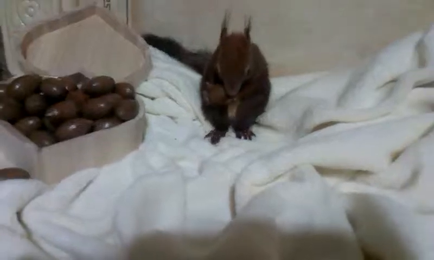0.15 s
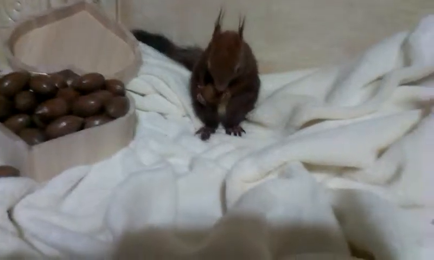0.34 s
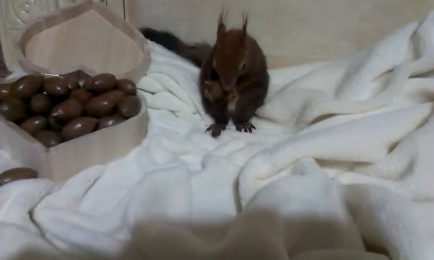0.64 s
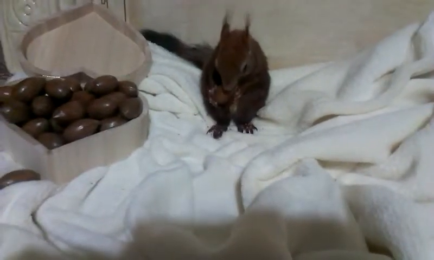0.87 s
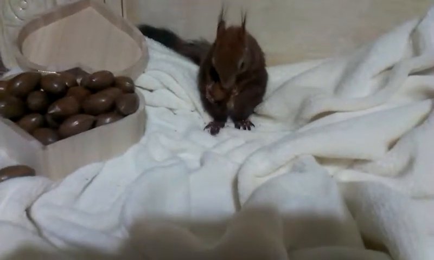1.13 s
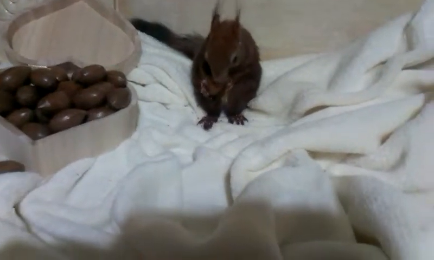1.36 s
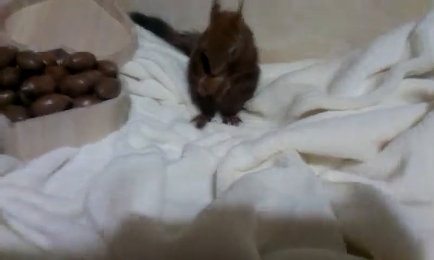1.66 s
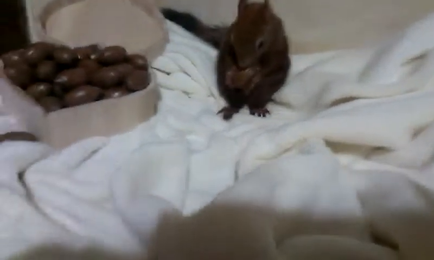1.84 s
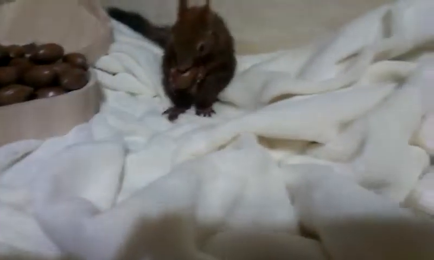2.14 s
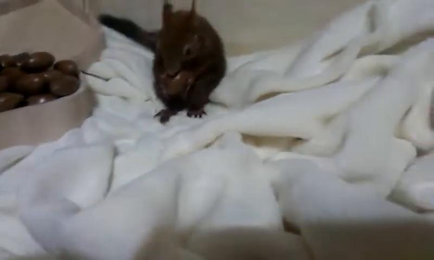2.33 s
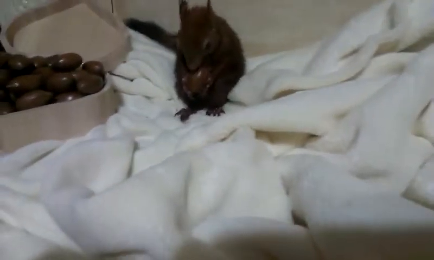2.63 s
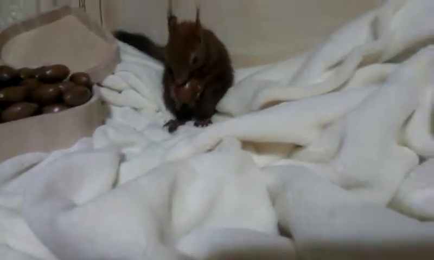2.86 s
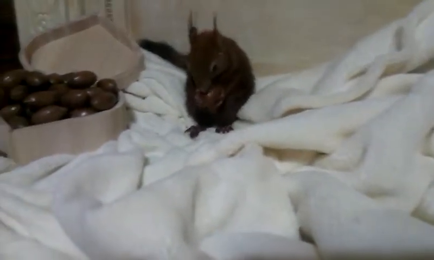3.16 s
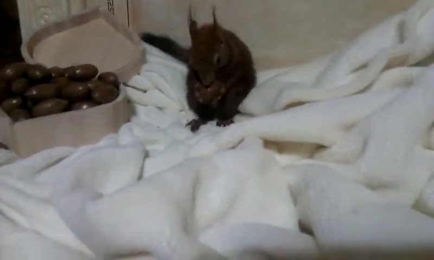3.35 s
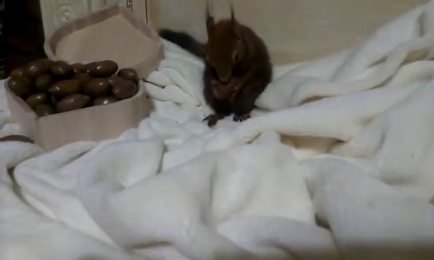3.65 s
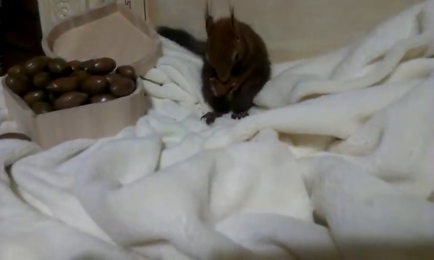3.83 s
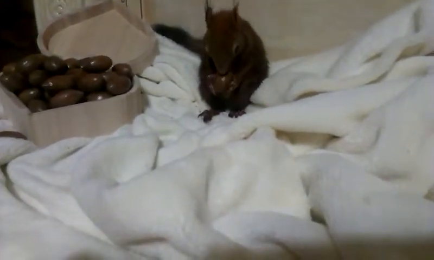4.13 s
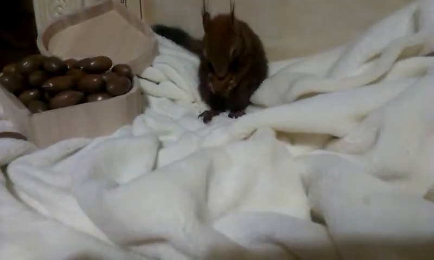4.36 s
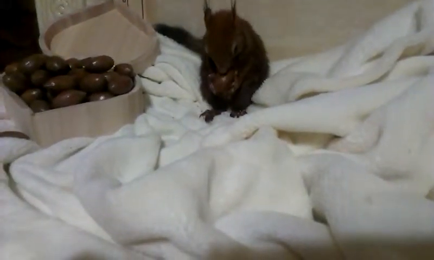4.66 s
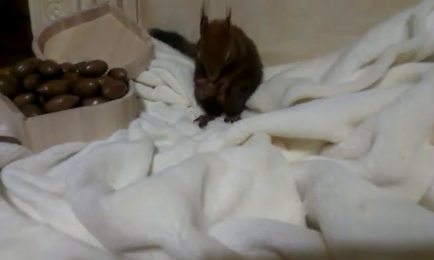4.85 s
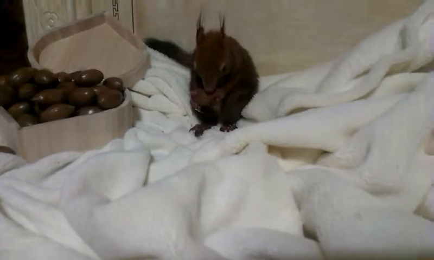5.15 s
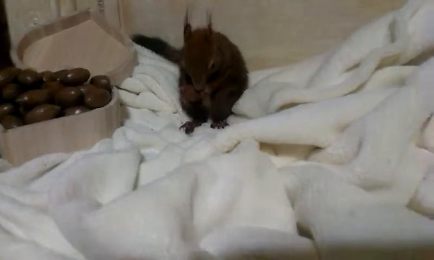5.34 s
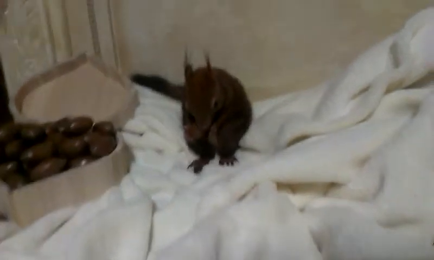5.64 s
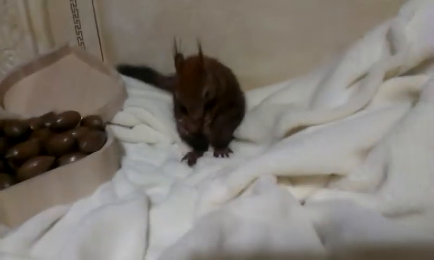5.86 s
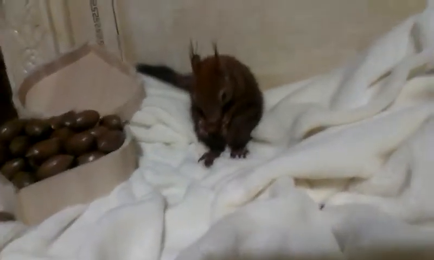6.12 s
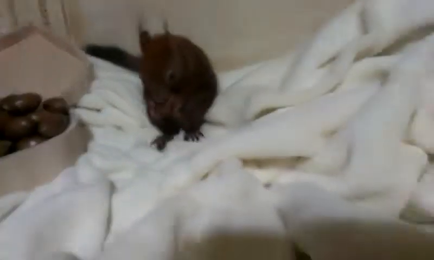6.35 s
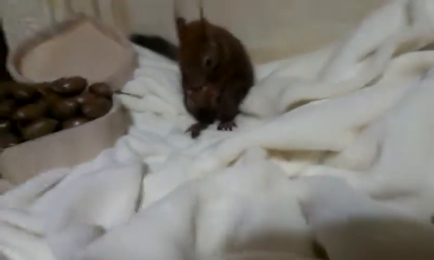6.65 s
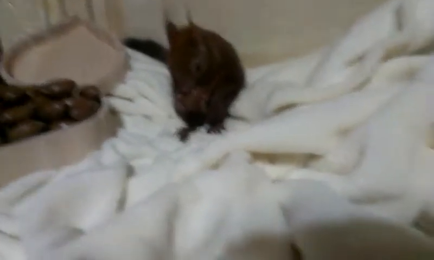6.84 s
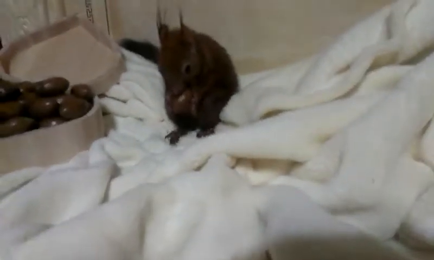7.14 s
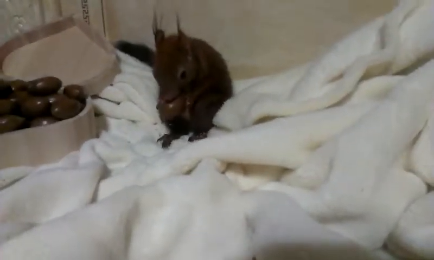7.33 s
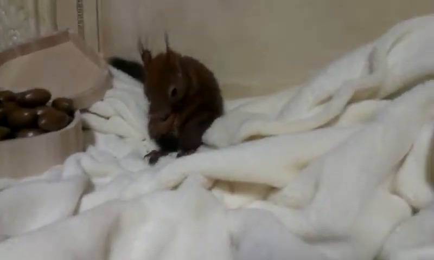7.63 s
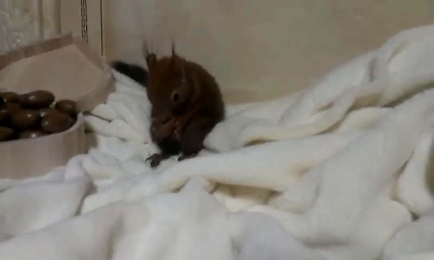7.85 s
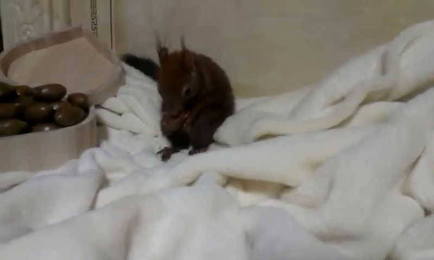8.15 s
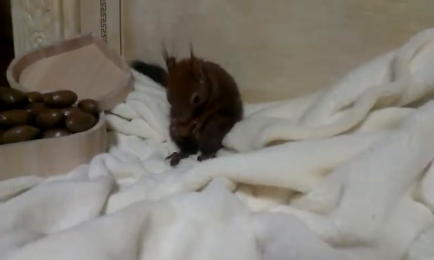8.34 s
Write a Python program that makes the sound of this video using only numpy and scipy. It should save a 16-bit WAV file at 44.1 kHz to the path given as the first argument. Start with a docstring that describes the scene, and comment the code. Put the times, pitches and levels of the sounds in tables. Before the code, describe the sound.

A squirrel gnaws a hard nut close to a hand-held microphone in a quiet room with a faint, steady hiss. Its teeth make short, soft, high rasps, mixed with tiny dry crackles of breaking shell. One sharp snap stands out at about 0.6 seconds, and a cluster of smaller cracks follows from 1.1 to 1.5 seconds. At 2 seconds a finger knocks on the microphone with a loud click and a softer thud. The gnawing goes on, with more crackles around 2.5 seconds and from 3 to 4 seconds, then turns faint and sparse. At about 6.1 seconds comes a heavy, dull handling bump with a very brief rattle, the loudest moment. Light knocks and rubbing continue until around 7 seconds, with a few shell cracks at 6.5. Soft scrapes and small ticks return from 7.5 seconds to just past 8.

```python
"""Squirrel gnawing a nut

A squirrel on a blanket in a quiet room gnaws a hard nut close to a hand-held camera. Its incisors
rasp over the shell in short strokes, shed tiny chips and now and then snap a bit off; the shell rings
briefly and the walls answer. The hand knocks and rubs the camera case; one heavy bump rattles it."""
import sys
import numpy as np
from scipy import signal
from scipy.fft import rfft, irfft
from scipy.io import wavfile

SR = 44100
rng = np.random.default_rng(int(sys.argv[2]) if len(sys.argv) > 2 else 0)


def materialize(psi):
    """Save the field psi as 16-bit PCM at rate SR to the path in sys.argv[1].

    A 1-D psi becomes a single channel; in a 2-D psi each row is a channel.
    """
    bounded = np.clip(np.atleast_2d(psi).T, -1, 1)
    quanta = np.round(bounded * 32767).astype(np.int16)
    wavfile.write(sys.argv[1], SR, quanta)


N = 374409
TIME_S = np.arange(N) / SR
TICK_LAG_S = 0.00027  # tick after thud

# tooth strokes: (start [s], length [s], level [dB])
STROKES = [(0.043, 0.021, -55), (0.204, 0.04, -57), (0.914, 0.043, -63), (1.062, 0.046, -58.5),
           (1.239, 0.066, -54.5), (1.435, 0.069, -58), (1.59, 0.019, -57), (2.168, 0.049, -63),
           (2.305, 0.073, -63.5), (2.512, 0.077, -60), (2.857, 0.058, -67), (3.027, 0.075, -62),
           (3.225, .056, -58.5), (3.396, 0.033, -53.5), (3.523, 0.068, -54.5), (3.77, 0.068, -52.5),
           (3.953, 0.044, -56.5), (4.454, 0.034, -65), (4.923, 0.04, -66), (5.267, 0.039, -68),
           (5.401, 0.037, -68), (5.576, 0.038, -68), (5.726, 0.03, -65), (6.523, .045, -62),
           (7.533, 0.11, -66.5), (7.746, .12, -65), (8.094, 0.032, -71)]
# brightest shell ring, set by where the teeth work: (time [s], frequency [Hz])
BITE_RING = [(.4, 6700), (1.07, 4600), (2.17, 6990), (5.27, 6000), (5.4, 4470), (6.5, 3500), (7.5, 6600)]
# path through the case to the microphone: (frequency [Hz], relative gain [dB])
CASE_RESPONSE = [(200, -7), (700, 5), (1500, 5.5), (3300, 2), (4600, 4.5), (6000, 4.5), (6900, 3),
                 (8200, -8), (10400, -7)]


def undb(db):
    """Decibels to gain."""
    return 10 ** (np.asarray(db) / 20)


def unit(x):
    """Scale to rms 1."""
    return x / np.sqrt(np.mean(x ** 2) + 1e-20)


def burst(x, db):
    """Scale a short sound so its energy, spread over 3 ms, has level db."""
    return x * undb(db) * np.sqrt(.003 * SR / np.sum(x ** 2))


def add(out, time_s, x):
    """Mix x into out from time_s on."""
    i = max(int(time_s * SR), 0)
    out[i:i + len(x)] += x[:len(out) - i]


def response(points, size=4096):
    """Minimum-phase impulse response of a (frequency [Hz], gain [dB]) curve."""
    hz, db = np.transpose(points)
    bins_hz = np.maximum(np.fft.rfftfreq(size, 1 / SR), 1)
    gain = undb(np.interp(np.log(bins_hz), np.log(hz), db))
    cepstrum = irfft(np.log(gain))
    cepstrum[1:size // 2] *= 2
    cepstrum[size // 2 + 1:] = 0
    return irfft(np.exp(rfft(cepstrum)))


def through(x, impulse_response):
    """Convolve, keeping the length of x."""
    return signal.fftconvolve(x, impulse_response)[:len(x)]


def band(x, low_hz, high_hz, order=2):
    """Butterworth band-pass."""
    sos = signal.butter(order, [low_hz, min(high_hz, SR / 2 - 1)], "band", fs=SR, output="sos")
    return signal.sosfilt(sos, x)


def grit(size, per_s, spread_db):
    """Friction: tiny slips at random times, a few much larger than the rest."""
    slips = (rng.random(size) < per_s / SR) * rng.choice([-1, 1], size)
    return slips * undb(spread_db * np.minimum(rng.exponential(size=size), np.pi))


def swell(size, power):
    """Rise and fall of a stroke, peak 1."""
    return np.sin(np.pi * (np.arange(size) + .5) / size) ** power


def shell(ring_hz, focus_db, log_width, scatter_db=4.0, size=700):
    """Shell modes swell for a few cycles and die; the bite spot favours those near ring_hz."""
    # (frequency [Hz], bandwidth [Hz], relative level [dB])
    modes = [(1270, 970, -6), (2264, 310, 0), (2820, 430, -1), (3560, 860, -4), (4300, 590, -2.5),
             (4900, 540, -8.5), (5584, 650, 1), (6460, 1800, 1), (6960, 600, -4), (7900, 1400, -20),
             (9820, 1600, -13)]
    hz, width_hz, db = np.transpose(modes)[:, :, None]
    t = np.arange(size) / SR
    favour_db = focus_db * np.exp(-(np.log(hz / ring_hz) / log_width) ** 2)
    weight = width_hz ** 2 * undb(db + favour_db + scatter_db * rng.standard_normal(db.shape))
    phase = rng.uniform(0, 2 * np.pi, db.shape)
    envelope = t * np.exp(-np.pi * width_hz * t)
    return np.sum(weight * envelope * np.sin(2 * np.pi * hz * t + phase), axis=0)


def snap(db, ring_hz, run_s=.001, splinter_gain=0.079, edge_db=-7, size=700):
    """One break: a sharp edge, then the shell's ring, fed by splinters as the break runs on."""
    force = splinter_gain * rng.standard_normal(size) * np.exp(-np.arange(size) / SR / run_s)
    force[0] += 1
    edge = band(force, ring_hz * 0.69, ring_hz * 1.076)
    focus_db = 9 + 0.3 * max(db + 48, 0)  # big, clean breaks favour the main ring
    ring = through(force, shell(ring_hz, focus_db, log_width=0.2296))
    return burst(edge, db + edge_db) + burst(ring, db)


def cracks():
    """Bits of shell break off."""
    # (time [s], level [dB], brightest ring [Hz])
    breaks = [(0.0503, -41.5, 7500), (0.2089, -52.5, 6720), (0.2637, -44.5, 6900), (0.462, -50.5, 6550),
              (0.6351, -20, 5950), (0.714, -53.5, 7100), (0.9427, -50, 6100), (1.102, -47, 5100),
              (1.116, -32.5, 7100), (1.2733, -36.5, 6900), (1.293, -42, 5000), (1.2976, -46, 5000),
              (1.453, -48, 5570), (1.4621, -34, 6350), (1.488, -46.5, 5800), (1.5066, -31.5, 6200),
              (1.569, -53, 5870), (1.739, -59, 4860), (2.555, -44, 6860), (2.568, -47, 6650),
              (2.964, -62, 6600), (3.0779, -41, 6200), (3.5424, -44.5, 6100), (3.5988, -51.5, 5770),
              (3.6342, -49.5, 6150), (3.794, -39, 5940), (3.823, -35, 5700), (4.044, -57.5, 5600),
              (4.807, -60.5, 5660), (5.6198, -54.5, 4250), (5.7457, -43.5, 4200), (5.828, -55.5, 5640),
              (6.336, -53, 5950), (6.522, -46, 6360), (6.5328, -38, 6800), (6.539, -40.5, 6430),
              (7.82, -47.5, 6110), (7.8418, -50.5, 5540)]
    out = np.zeros(N)
    for time_s, db, ring_hz in breaks:
        add(out, time_s, snap(db, ring_hz))
    return out


def scrapes(rasp_db=-15, spots=3):
    """Incisors chatter over several spots of the shell: its modes ring over a duller, dry rasp."""
    out = np.zeros(N)
    for start_s, length_s, db in STROKES:
        size = int(length_s * SR)
        ring_hz = np.interp(start_s, *np.transpose(BITE_RING))
        slips = [grit(size, per_s=870, spread_db=10.5) for _ in range(spots)]
        ring = unit(sum(through(slip, shell(ring_hz, focus_db=8.5, log_width=0.24)) for slip in slips))
        rasp = unit(band(sum(slips), 1100, 2700)) * undb(rasp_db)
        add(out, start_s, (ring + rasp) * swell(size, power=0.42) * undb(db))
    return out


def chips(per_s=16, scatter_db=3, max_per_stroke=4):
    """Strokes shed tiny chips at random; harder strokes shed louder ones."""
    out = np.zeros(N)
    for start_s, length_s, db in STROKES:
        ring_hz = np.interp(start_s, *np.transpose(BITE_RING))
        chance = per_s * length_s / max_per_stroke
        for place, draw in rng.random((max_per_stroke, 2)):
            chip = snap(db + scatter_db * rng.standard_normal(), ring_hz)
            if draw < chance:
                add(out, start_s + place * length_s, chip)
    return out


def hollow(x):
    """Air in the opened nut resonates with each bite, more as the hole widens."""
    # (time [s], gain [dB])
    resonance = [(0, -27), (1.1, -16), (3.4, -7.5), (8.49, -11)]
    return band(x, 2200, 2900) * undb(np.interp(TIME_S, *np.transpose(resonance)))


def room(x, t60_s=0.16, tail_db=-17, build_s=0.0037, size=11000):
    """Early echoes off a nearby wall and box, then the soft room's short tail."""
    t = np.arange(size) / SR
    envelope = undb(-60 * t / t60_s) * (1 - np.exp(-t / build_s))
    tail = band(rng.standard_normal(size) * envelope, 600, 4800, order=1)
    echoes = tail * undb(tail_db) / np.sqrt(np.sum(tail ** 2))
    for lag_s, db in [(.0024, -13), (.0095, -43.5), (.0148, -32.5)]:
        echoes[int(lag_s * SR)] += undb(db)
    return through(x, echoes)


def thud(db, hz):
    """Dead thud of a fingertip, lower for a soft touch."""
    return burst(band(signal.unit_impulse(2048), hz * 0.36, hz * 1.29), db)


def tick(db, top_hz, echo_s=.00032, echo_gain=0.24):
    """Dry tick, duller for a soft touch; the case carries it and echoes it once inside."""
    direct = band(response(CASE_RESPONSE), 93, top_hz)
    return burst(direct + echo_gain * np.roll(direct, int(echo_s * SR)), db)


def slide(length_s, rumble_db, hiss_db, size=32768):
    """Skin sticks and slips on the case: rumble under a gritty hiss."""
    # case under the hand: (frequency [Hz], relative gain [dB])
    rumble_spectrum = [(30, -9), (52, -16.5), (95, 1.5), (300, -3.5), (600, -10.5), (1100, -18.5),
                       (2500, -25.5), (6000, -51)]
    span = int(length_s * SR)
    rumble = unit(through(grit(size, per_s=1200, spread_db=4), response(rumble_spectrum))[:span])
    hiss = unit(through(grit(size, per_s=5000, spread_db=4), response(CASE_RESPONSE))[:span])
    return (undb(rumble_db) * rumble + undb(hiss_db) * hiss) * swell(len(hiss), power=1.1)


def knocks():
    """Fingers knock on the case: a thud, then a tick."""
    # (time [s], thud level [dB], thud frequency [Hz], tick level [dB], tick top [Hz])
    touches = [(0.219, -37, 196, -59, 2500), (0.3144, -59, 900, -74, 2500), (1.033, -53.5, 149, -75, 1000),
               (1.9704, -25.5, 554, -18.5, 18000), (2.087, -30.5, 400, -49, 4200),
               (3.9229, -67, 700, -59.5, 1800), (5.5032, -50, 400, -52.5, 3180),
               (5.928, -46.5, 380, -45, 2520), (6.088, -30, 190, -36, 1490),
               (6.0928, -24, 167, -55.5, 1010), (6.1604, -42.5, 620, -41, 1800),
               (6.23, -47.5, 450, -56, 3030), (6.2678, -51, 500, -50.5, 6100),
               (6.494, -59, 550, -52.5, 2400), (6.5682, -40, 583, -39.5, 3000),
               (6.6185, -37, 380, -80, 2000), (6.7446, -75, 1200, -46.5, 12000),
               (6.764, -44.5, 278, -70, 2000)]
    out = np.zeros(N)
    for time_s, thud_db, thud_hz, tick_db, top_hz in touches:
        add(out, time_s, thud(thud_db, thud_hz))
        add(out, time_s + TICK_LAG_S, tick(tick_db, top_hz))
    return out


def rubs():
    """The hand slides over the case as it shifts its grip."""
    # (start [s], length [s], rumble level [dB], hiss level [dB])
    grip_shifts = [(4.884, 0.47, -75, -103), (5.429, 0.66, -70, -76), (5.917, .05, -49, -85),
                   (5.949, 0.22, -56.5, -80), (6.113, 0.16, -59, -55), (6.433, 0.22, -66.5, -60.5),
                   (6.609, .11, -58.5, -49), (6.718, .136, -59.5, -62), (6.835, .108, -58.5, -59.5),
                   (6.9, 0.33, -71.5, -69.5)]
    out = np.zeros(N)
    for start_s, length_s, rumble_db, hiss_db in grip_shifts:
        add(out, start_s, slide(length_s, rumble_db, hiss_db))
    return out


def bump(hit_s=6.0976, press_s=0.023, rebound_s=.0044, rattle_gap_s=.0024, fade_db_per_s=476.5):
    """The hand presses in, hits and skids off; the case rebounds and a loose part rattles."""
    out = np.zeros(N)
    add(out, hit_s - press_s, slide(2 * press_s, rumble_db=-31, hiss_db=-53))
    add(out, hit_s, thud(db=-14.5, hz=308.5))
    add(out, hit_s + TICK_LAG_S, tick(db=-17.0, top_hz=1040))
    add(out, hit_s + rebound_s, thud(db=-19.5, hz=122))
    add(out, hit_s + rebound_s, slide(length_s=0.031, rumble_db=-43, hiss_db=-39.5))
    gaps_s = rattle_gap_s * (1 + 0.13 * rng.standard_normal(8))
    for after_s in np.cumsum(gaps_s):
        rattle_db = -29.5 - fade_db_per_s * after_s + 2 * rng.standard_normal()
        add(out, hit_s + after_s, tick(rattle_db, top_hz=3500))
    return out


def jolts(cycles=2.1):
    """Each camera jolt presses air on the microphone: a slow, dying sway."""
    # (time [s], level [dB], frequency [Hz])
    sways = [(5.955, -39, 18), (6.087, -24, 22)]
    out = np.zeros(N)
    for time_s, db, hz in sways:
        turns = np.arange(int(cycles / hz * SR)) / SR * hz
        add(out, time_s, undb(db) * np.sin(2 * np.pi * turns) * (1 - turns / cycles))
    return out


def background(floor_db=-67):
    """Steady room and microphone noise; a thin, high hiss comes and goes."""
    # (frequency [Hz], relative density [dB])
    floor_spectrum = [(20, 16.5), (45, 8), (80, 4), (150, -4), (300, -0.5), (800, -4.5), (2000, -7),
                      (4000, -9), (6000, -10), (8000, -18.5), (10500, -14.5)]
    # (time [s], level [dB])
    hiss_levels = [(0, -74), (.7, -71.5), (1.98, -73), (2.08, -79), (4.2, -99), (6.3, -80), (8.49, -82.5)]
    floor = unit(through(rng.standard_normal(N), response(floor_spectrum)))
    hiss = unit(band(rng.standard_normal(N), 5700, 7200))
    return floor * undb(floor_db) + hiss * undb(np.interp(TIME_S, *np.transpose(hiss_levels)))


def scene():
    """Mono mix: gnawing in the room, camera handling, background."""
    nut = band(cracks() + chips() + scrapes(), 700, 17000)  # too small to radiate bass
    nut = nut + hollow(nut)
    return (nut + room(nut) + knocks() + rubs() + bump() + jolts() + background())[None]


def record(dry):
    """The camera cuts the top; its converter rests slightly off zero."""
    top_hz, dc_offset = 10400, .0166
    lowpass = signal.ellip(10, .2, 70, top_hz, fs=SR, output="sos")
    return signal.sosfilt(lowpass, dry) + dc_offset


dry = scene()
out = record(dry)
materialize(out)
```